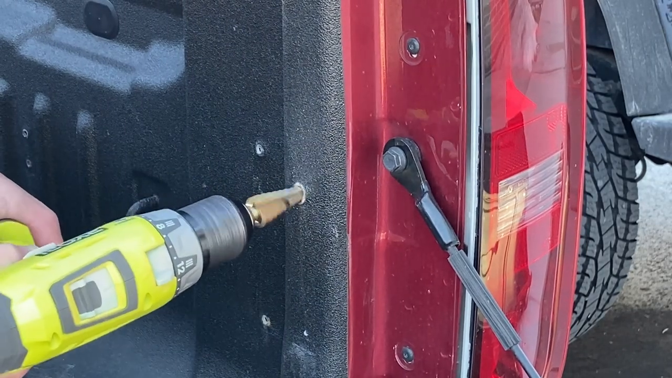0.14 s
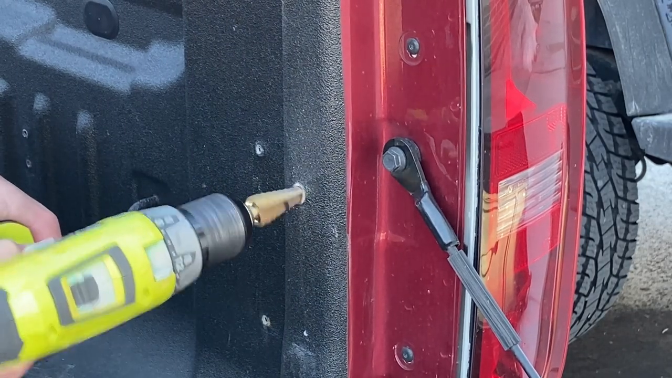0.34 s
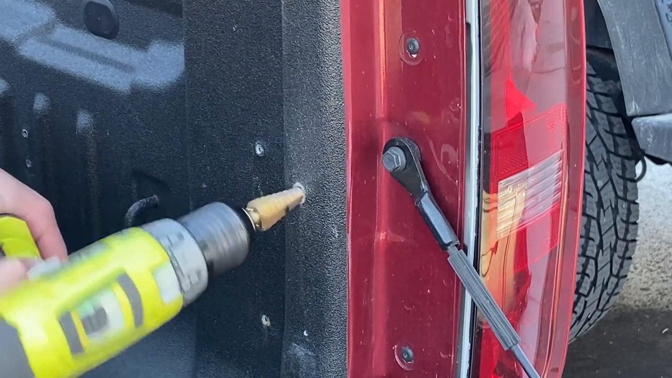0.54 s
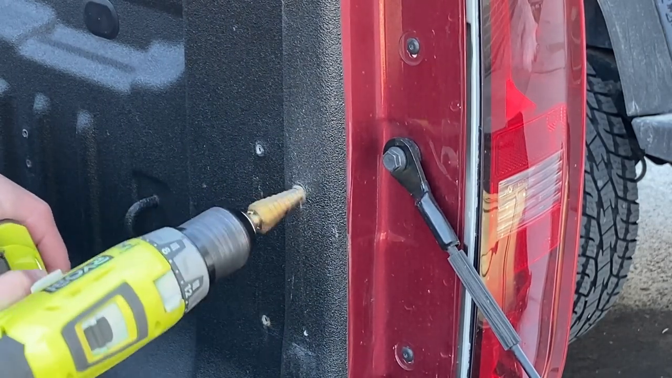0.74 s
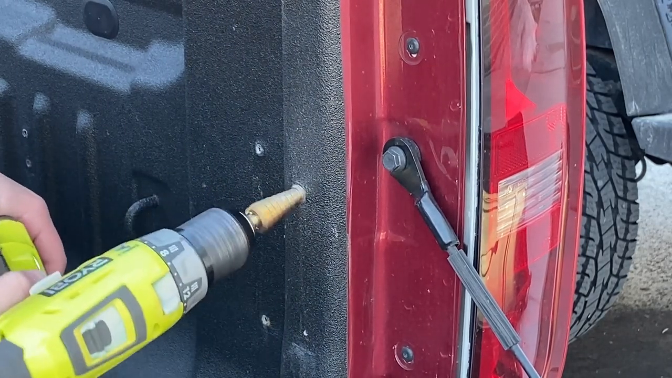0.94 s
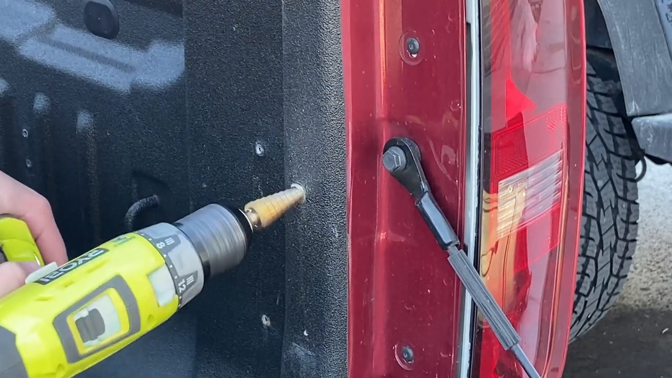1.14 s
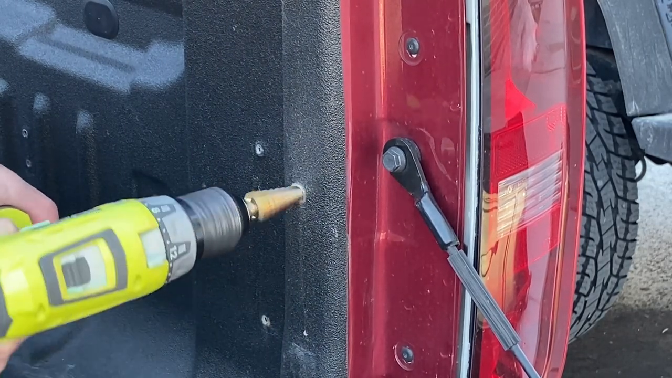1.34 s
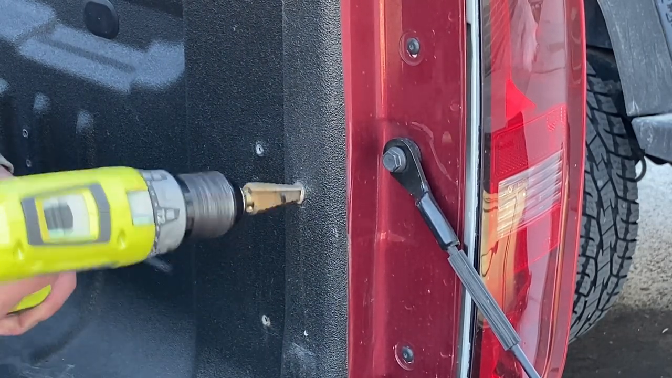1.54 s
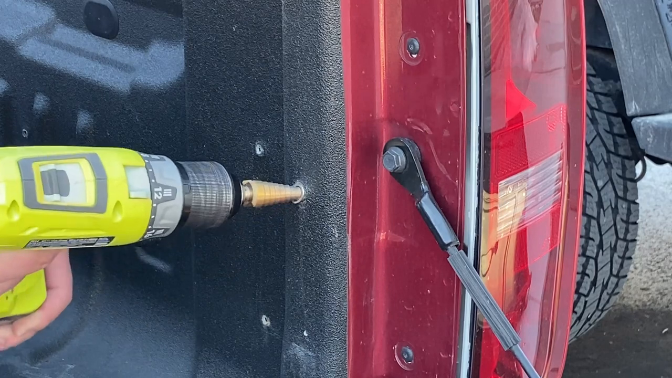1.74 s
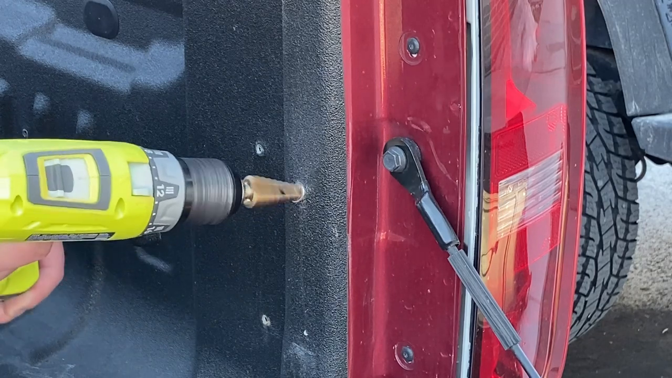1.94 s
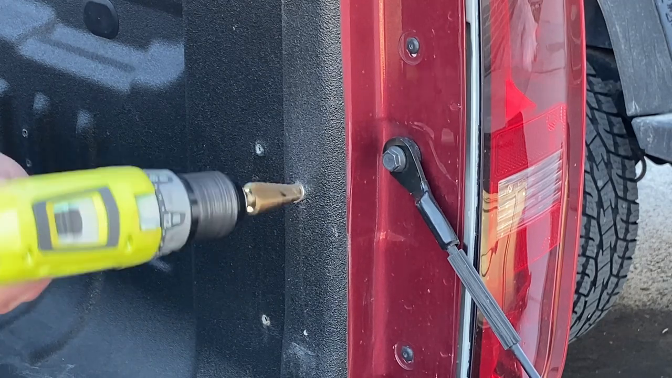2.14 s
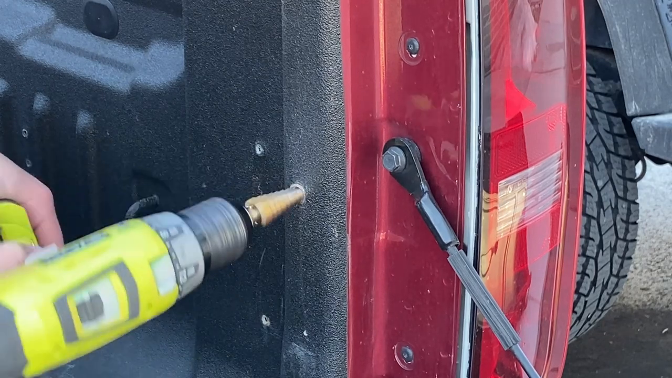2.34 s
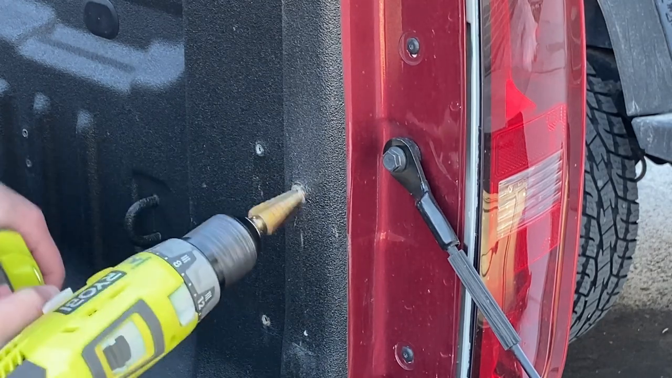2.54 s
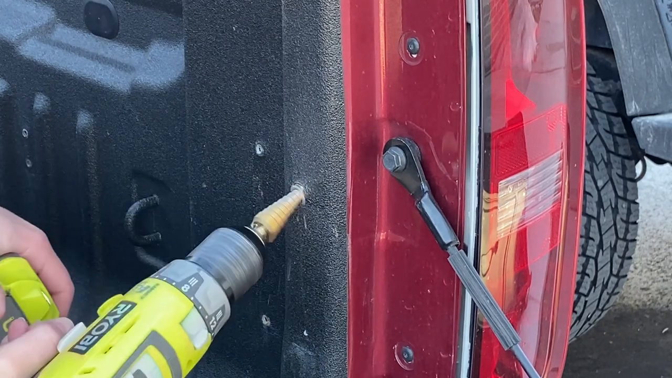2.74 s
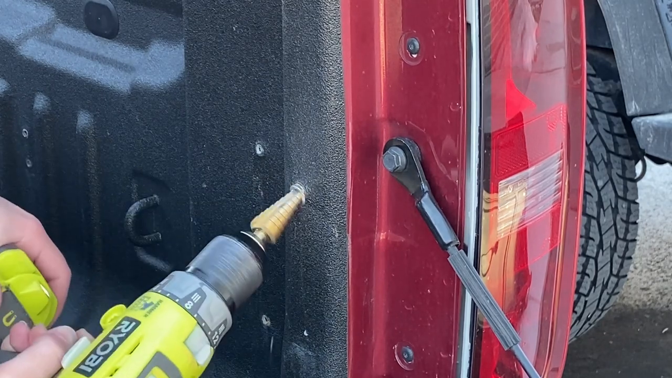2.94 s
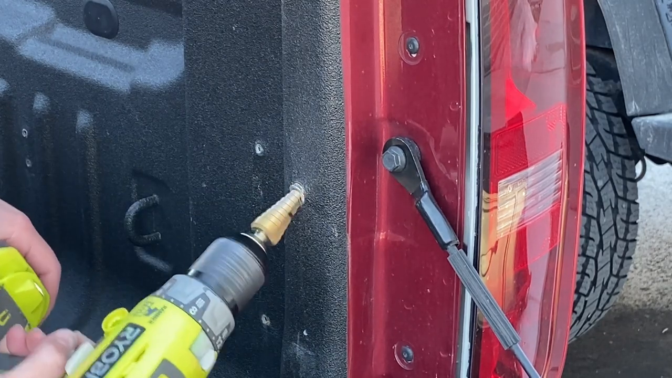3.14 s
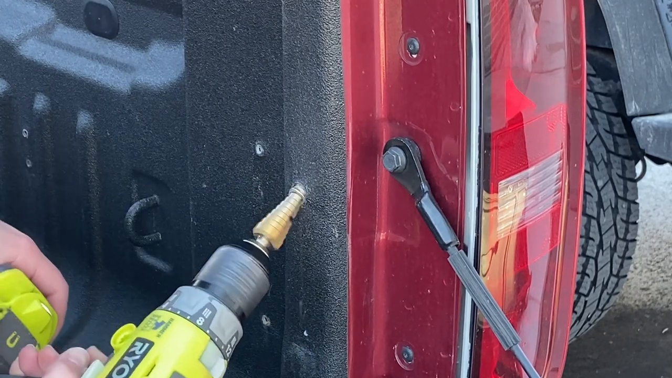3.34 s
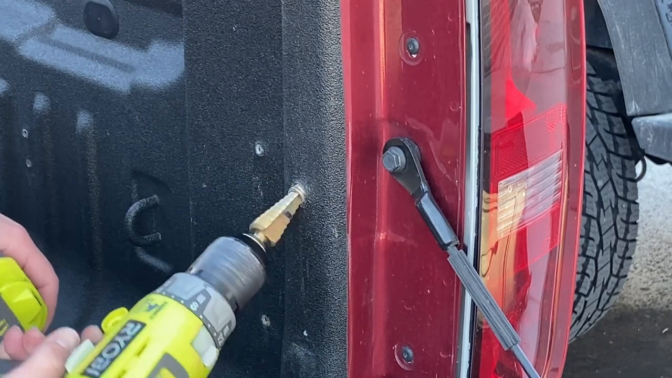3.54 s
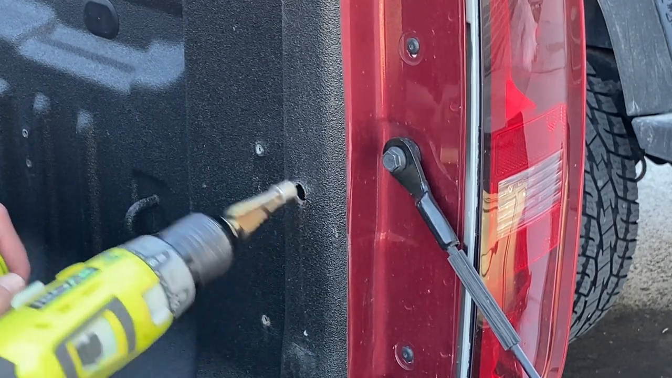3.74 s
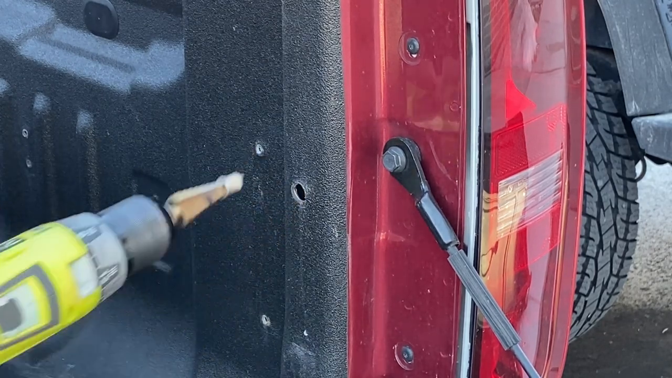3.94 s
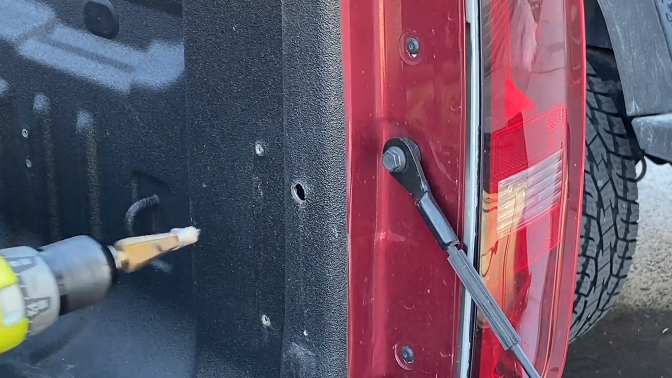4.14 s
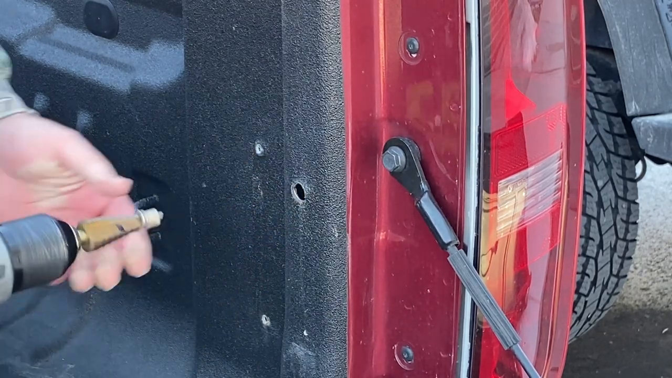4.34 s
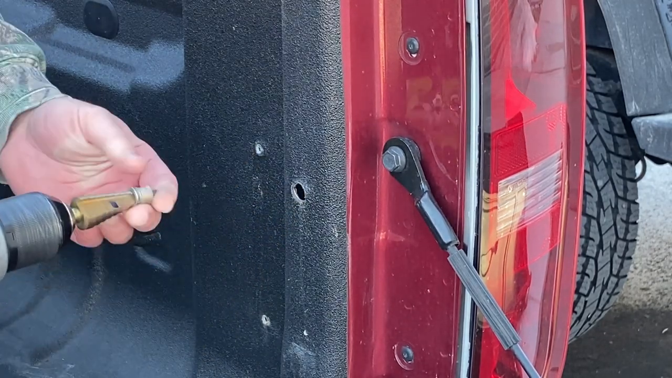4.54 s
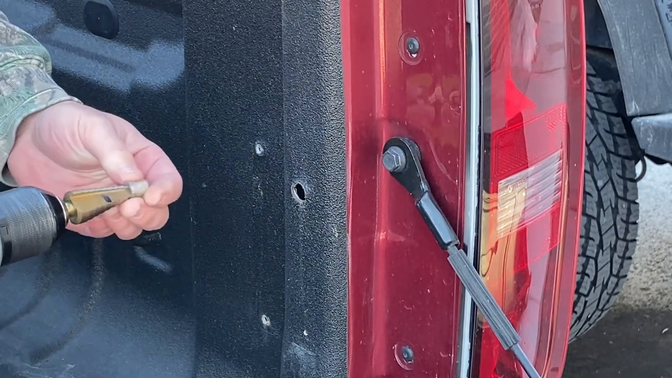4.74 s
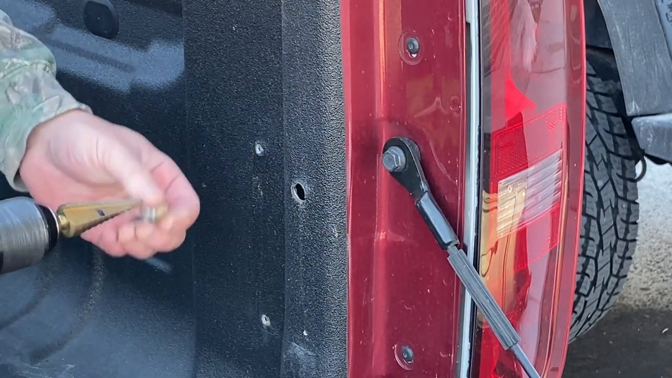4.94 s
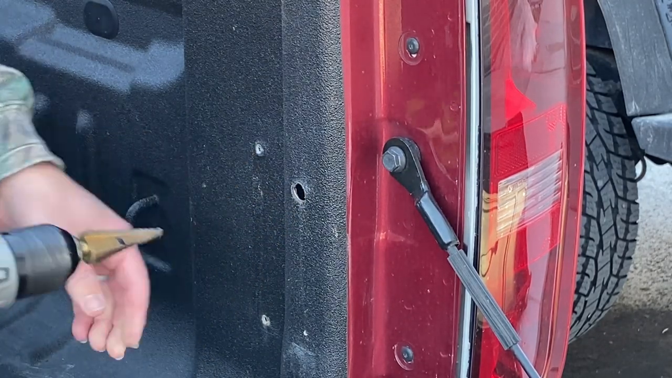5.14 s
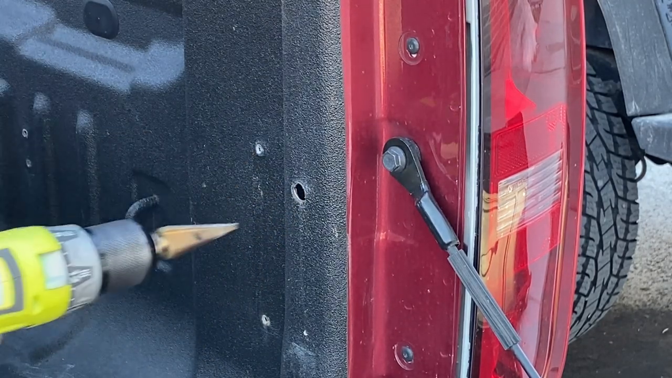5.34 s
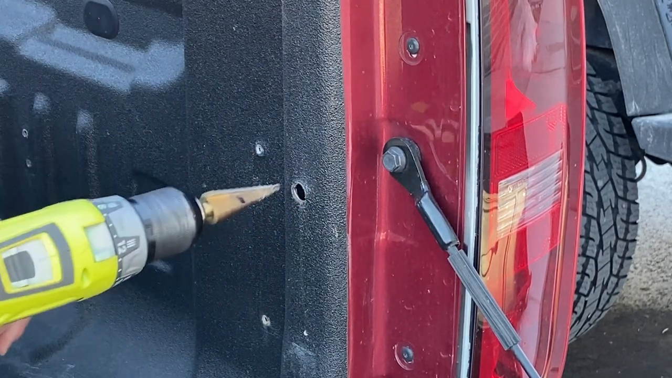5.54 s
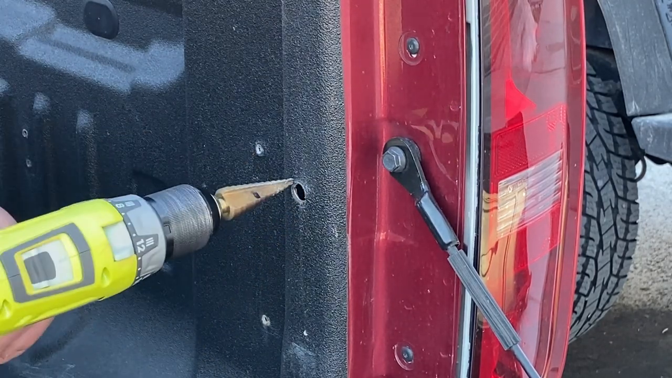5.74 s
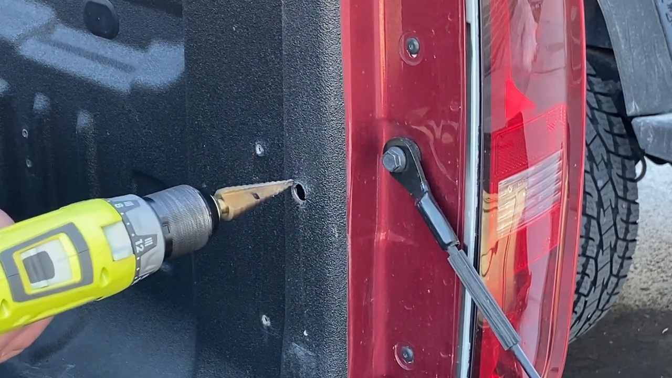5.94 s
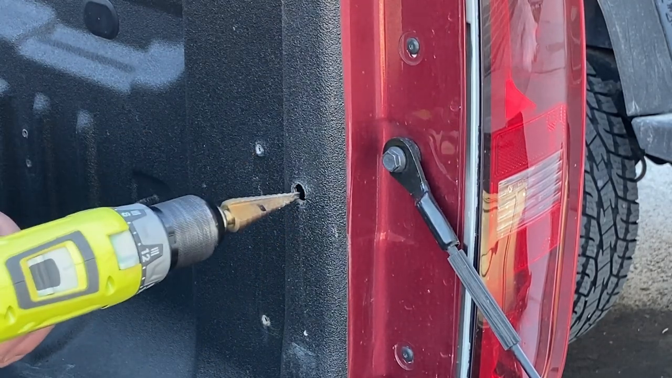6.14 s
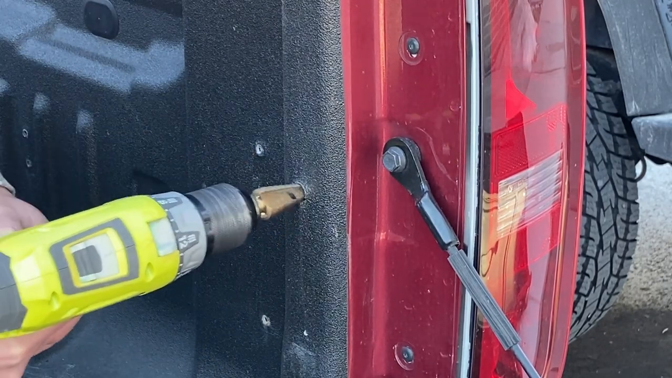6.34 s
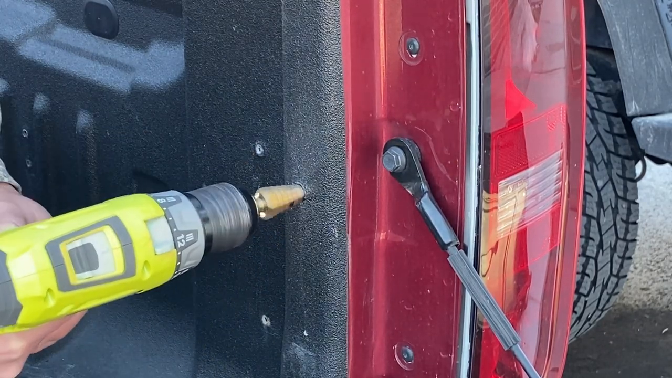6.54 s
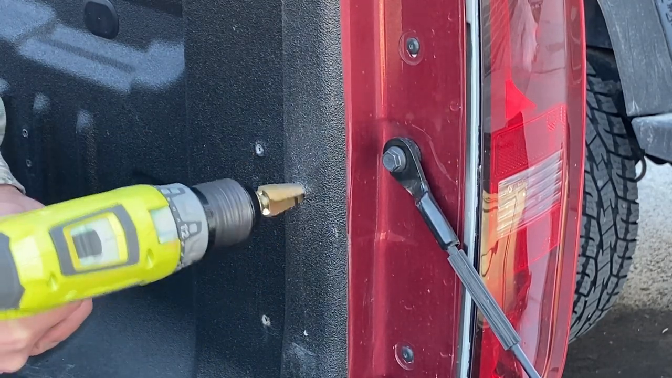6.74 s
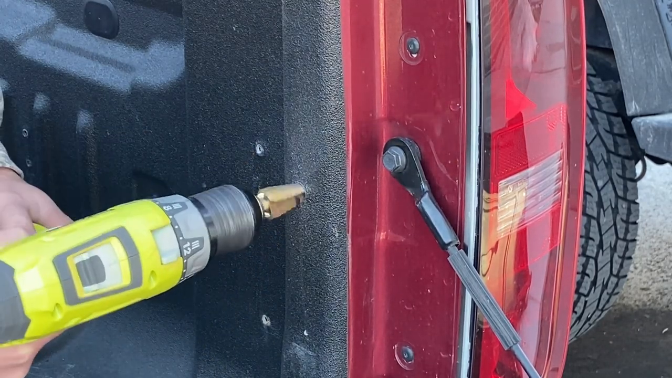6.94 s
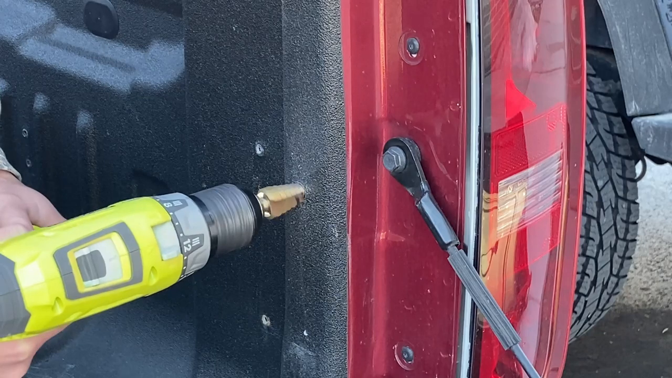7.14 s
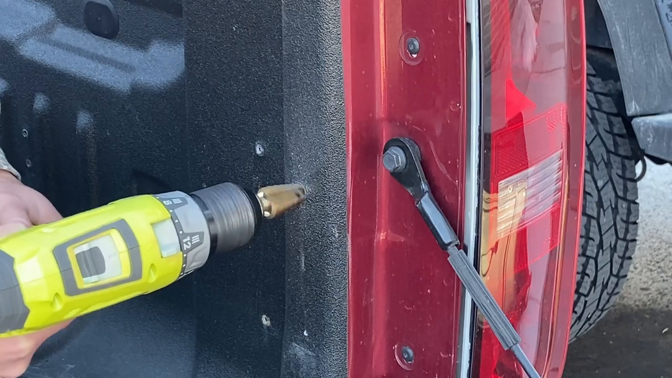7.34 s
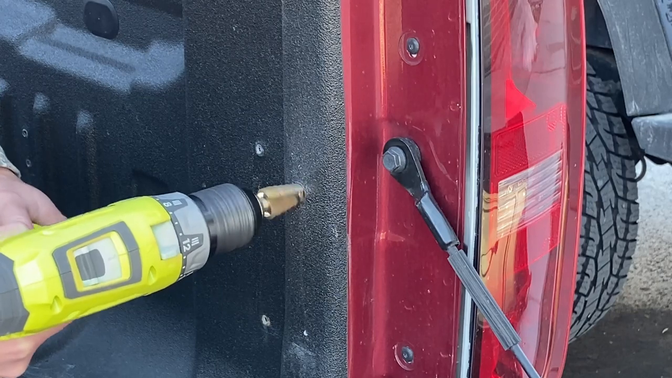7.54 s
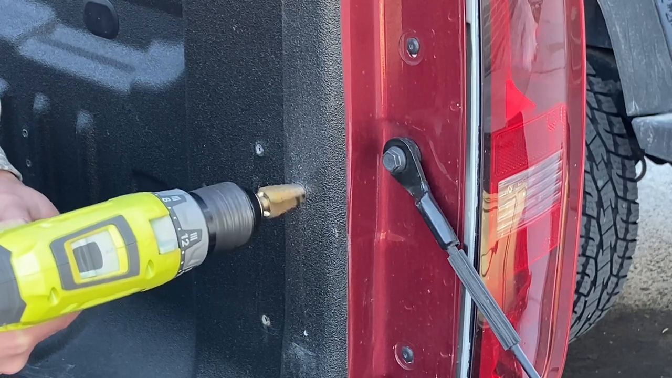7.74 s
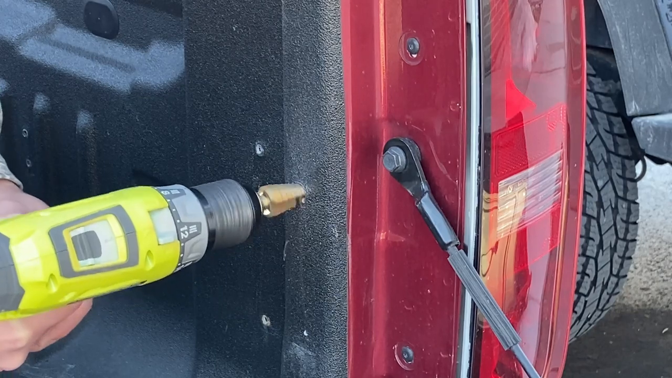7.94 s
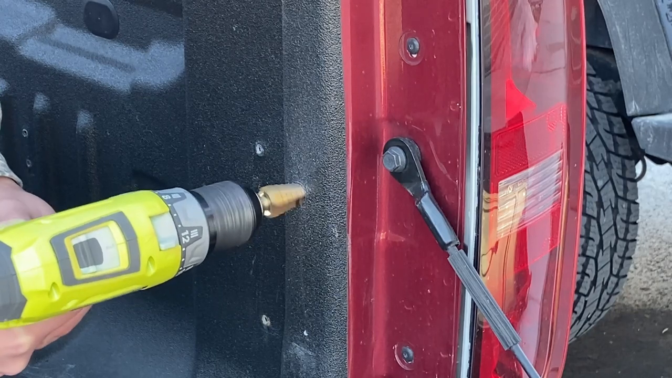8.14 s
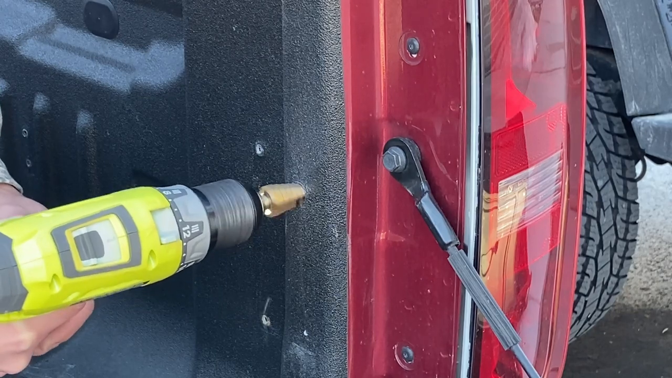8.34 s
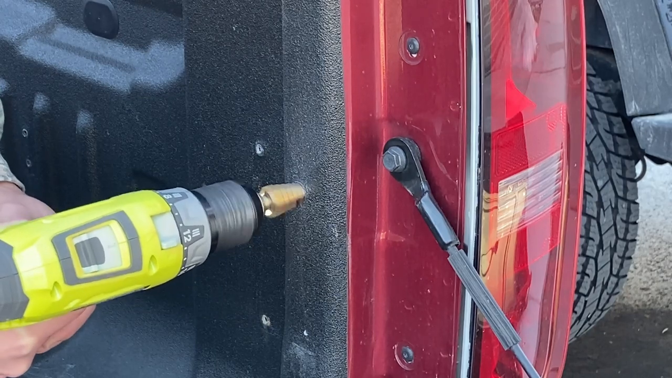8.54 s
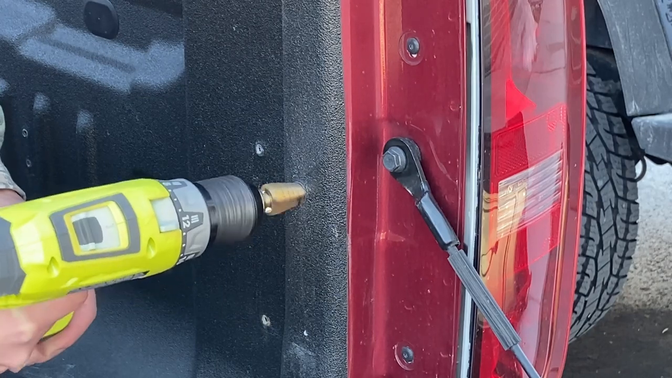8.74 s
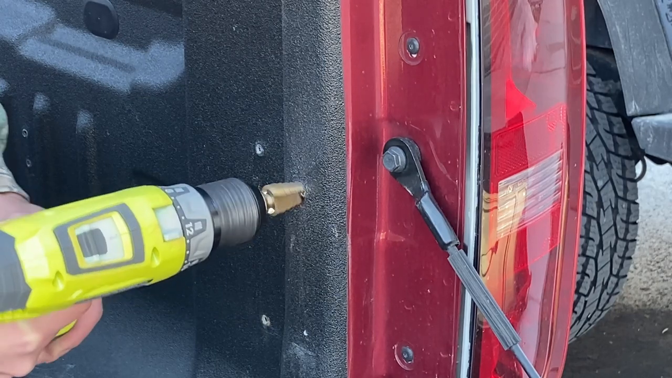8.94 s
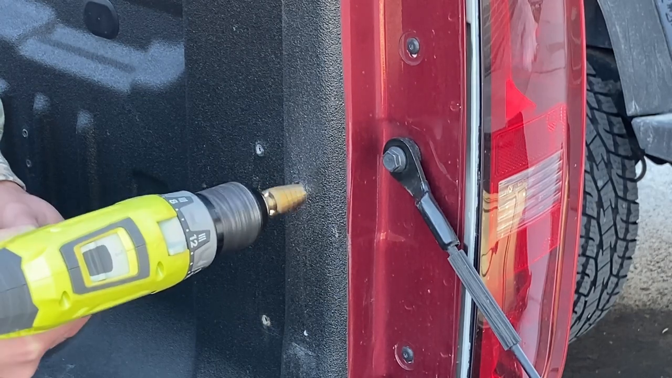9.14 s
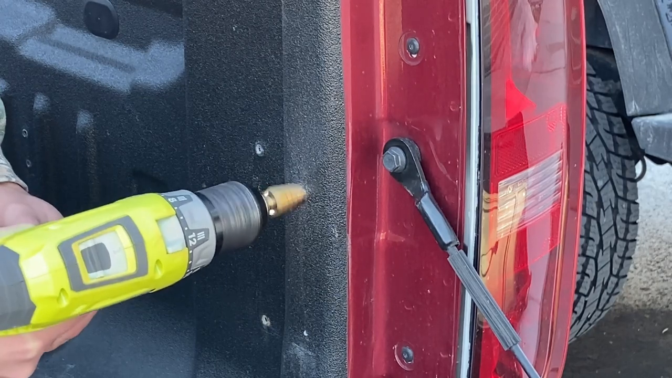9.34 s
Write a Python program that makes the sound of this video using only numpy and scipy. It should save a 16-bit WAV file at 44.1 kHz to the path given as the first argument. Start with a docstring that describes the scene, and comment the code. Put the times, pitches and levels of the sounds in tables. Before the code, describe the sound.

A cordless drill spins up close by and grinds into a steel truck bed, its gear whine and gritty rasp over a low panel drumming. It winds down, restarts almost at once with a sagging pitch, then stops. Scrapes and metal clacks fill the pause before a third burst with sharp bit catches. Close stereo microphone outdoors, faint street hum and light wind.

```python
"""A cordless drill with a stepped bit reams a fastener out of a steel truck bed, outdoors, in three bursts.
Hiss and gear rasp are shaped noise, the whine is a set of lines tied to motor speed, and the cutting force
swells once a turn and drums the bed panel's modes. At listed moments the bit catches; between bursts tool
and loose fastener knock on the steel, as dying noise puffs through resonances. The bed walls answer with
a diffuse tail; a distant street hum and light wind on the microphone lie behind."""
import sys
import numpy as np
from scipy import signal
from scipy.fft import rfft, irfft, next_fast_len
from scipy.io import wavfile
from scipy.ndimage import uniform_filter1d, map_coordinates

SR = 44100
rng = np.random.default_rng(int(sys.argv[2]) if len(sys.argv) > 2 else 0)


def bounce(signal):
    """Save signal as a 16-bit WAV file at the path given by the first command-line argument."""
    frames = np.transpose(np.atleast_2d(signal))
    limited = np.clip(frames, -1, 1)
    pcm = np.round(limited * 32767).astype(np.int16)
    wavfile.write(sys.argv[1], SR, pcm)


N = 414540  # samples


def amp(db):
    """Level to amplitude: 20 dB is a factor of ten."""
    return 10 ** (np.asarray(db) / 20)


def unit(x):
    """Normalisation to an rms of 1."""
    return x / np.sqrt(np.mean(x ** 2) + 1e-20)


def along(points, hz):
    """Interpolation of (frequency, value) points on a logarithmic frequency axis."""
    f, v = np.transpose(points)
    return np.interp(np.log(hz + 1), np.log(f + 1), v)


def curves(rows):
    """Linear interpolation in time: one value per sample for each column after the time."""
    s, *cols = np.transpose(rows)
    return [np.interp(np.arange(N) / SR, s, c) for c in cols]


def during(rows):
    """Gating: 1 while a table lasts, with 20 ms fades outside it."""
    t = np.arange(N) / SR
    inside = np.minimum(t - rows[0][0], rows[-1][0] - t)
    return np.clip(inside * 50 + 1, 0, 1)


def wobble(rate):
    """Slow random modulation: a smooth curve with rate knots a second."""
    knots = rng.standard_normal(int(N * rate / SR) + 4)
    return map_coordinates(knots, [np.arange(N) * rate / SR])


def filtered(x, response):
    """Linear filtering: the spectrum times a complex response of frequency."""
    m = next_fast_len(N + SR // 2)
    return irfft(rfft(x, m) * response(np.fft.rfftfreq(m, 1 / SR)), m)[..., :N]


def through(x, response):
    """Linear filtering with the response normalised to keep the rms of white noise."""
    return filtered(x, lambda f: response(f) / np.sqrt(np.mean(np.abs(response(f)) ** 2)))


def modes(table):
    """Modal superposition: causal damped resonators with alternating signs."""
    def response(f):
        return sum((-1) ** k * amp(db) * 1j * f * w / (c * c - f * f + 1j * f * w)
                   for k, (c, w, db) in enumerate(table))
    return response


def colour(points):
    """Spectral shaping: a zero-phase response that follows (frequency, level) points."""
    return lambda f: amp(along(points, f))


def lowpass(edge_hz):
    """Two cascaded first-order low-pass sections."""
    return lambda f: 1 / (1 + 1j * f / edge_hz) ** 2


def grit(rough_db, patchy_db):
    """Modulated noise: strength jumps by the millisecond, and narrow patches flare briefly."""
    noise = rng.standard_normal(N) * amp(rough_db * wobble(700))
    z = signal.stft(noise, nperseg=1024)[2]
    field = uniform_filter1d(rng.standard_normal(z.shape), size=2, axis=0)
    field = uniform_filter1d(field, size=5, axis=1)
    return unit(signal.istft(z * amp(patchy_db * unit(field)), nperseg=1024)[1][:N])


def bursts(times, levels_db, t60, rise=0.0004):
    """Exponential decay: noise puffs that fall 60 dB in t60 seconds."""
    out, t = np.zeros(N + SR), np.arange(SR // 4) / SR
    for s, db in zip(times, levels_db):
        envelope = amp(db - 60 * t / t60) * (1 - np.exp(-t / rise))
        out[round(s * SR):][:len(t)] += envelope * rng.standard_normal(len(t))
    return out[:N]


def tones(hz, db, waver_hz, waver_db, ratio=1):
    """Frequency modulation: the integral of a gliding, slightly unsteady pitch is the phase."""
    level = amp(db + 0.5 + waver_db * wobble(25))
    pitch = ratio * (hz + waver_hz * wobble(60))
    return level * np.sin(2 * np.pi * np.cumsum(pitch) / SR)


# motor speed in each of three bursts: (time [s], gear mesh frequency [Hz])
MOTOR_SPEED = [
    [(.04, 250.8), (.09, 900), (.16, 2703), (.21, 3834), (.265, 4106), (.55, 4164), (.63, 3985),
     (.77, 4143), (.8, 3933), (.88, 4082), (.92, 3940), (.98, 4132), (1.06, 4153), (1.17, 4046),
     (1.3, 4184), (1.39, 4224), (1.435, 4193), (1.57, 3252), (1.63, 2684), (1.76, 2459), (1.8, 1990),
     (1.84, 1495), (1.865, 299.2)],
    [(1.98, 500.5), (2.0, 1300), (2.035, 2606), (2.085, 3484), (2.12, 3827), (2.21, 3840), (2.27, 3439),
     (2.37, 2912), (2.42, 2895), (2.47, 3847), (2.54, 4085), (2.59, 3990), (2.63, 4050), (2.74, 3850),
     (2.8, 3213), (2.89, 2917), (2.92, 2414), (3.17, 2364), (3.205, 3385), (3.27, 3983), (3.39, 4163),
     (3.5, 3628), (3.575, 3178), (3.61, 502.6)],
    [(6.5, 704), (6.56, 1102), (6.76, 2759), (6.9, 2600), (7.29, 2900), (7.36, 3794), (7.43, 4010),
     (7.7, 4163), (7.9, 4110), (7.98, 4010), (8.1, 3974), (8.25, 4040), (8.35, 3940), (8.51, 3850),
     (8.58, 3927), (8.62, 3886), (8.67, 3940), (8.72, 3870), (8.78, 3967), (8.89, 3770), (8.97, 3790),
     (9.02, 3870), (9.075, 3850), (9.11, 2830), (9.28, 2785), (9.33, 3650), (9.4, 3900)],
]
FULL_HZ = 4100  # mesh frequency at full speed


def motor():
    """Gear meshing: pitch follows speed; gives mesh Hz, speed in dB re full speed, and 1 while turning."""
    hz, = curves(sum(MOTOR_SPEED, []))
    return hz, 20 * np.log10(hz / FULL_HZ), sum(during(rows) for rows in MOTOR_SPEED)


# each burst is held at its own angle, one row a burst: (hiss [dB], rasp [dB], rumble [dB])
BURST_ANGLE = [(0.3, 0.47, 3), (0.54, 0.8, -2.5), (0.53, -0.5, -2.5)]


def held():
    """Directivity: gains of hiss, rasp and rumble, each burst's own while it lasts and 0 between."""
    return sum(amp(db)[:, None] * during(rows) for rows, db in zip(MOTOR_SPEED, BURST_ANGLE))


# hiss spectrum of brushes and fan: (frequency [Hz], relative density [dB per Hz])
HISS_SPECTRUM = [(1500, -22.5), (4000, -7.5), (6000, -5), (7200, -1.5), (8300, -3.5), (10300, 1.5),
                 (11200, -6.5), (13000, -3), (16000, -4)]
# relative level at full speed [dB], and dB gained per dB of speed
HISS_DB, HISS_GROWS = -42, 2.25
DRAG_HISS_DB = -13  # re the scrape of the dragging bit


def brush_hiss(speed_db, angle, drag, shake):
    """Broadband brush and fan noise, whose level grows as a power of speed."""
    hiss = amp(7 + .5 * shake) * through(grit(rough_db=1.0, patchy_db=3.0), colour(HISS_SPECTRUM))
    return (angle * amp(HISS_DB + HISS_GROWS * speed_db) + amp(DRAG_HISS_DB) * drag) * hiss


# gearbox resonances: (frequency [Hz], width [Hz], relative level [dB])
GEARBOX_MODES = [(1345, 263, -1.5), (1784, 770, -5.5), (2407, 403, 0.5), (2738, 347, 2), (3310, 750, -4.5),
                 (3850, 450, -2.5), (4526, 400, -5), (5280, 470, -8.5)]
# strongest band of the rasp: (frequency [Hz], width [Hz], level [dB])
STRONG_BAND = (2600, 700, 0)
# change at the centre of that band: (time [s], gain [dB])
STRONG_BAND_GAIN = [(0, -1), (1.4, -2.5), (1.62, 5.5), (2.1, -1), (3.0, -1.5), (3.6, -9.5), (6.6, 3),
                    (7.3, 4.5), (8.0, -2), (8.45, 3), (9.1, 4.5), (9.4, -2)]
# relative level at full speed [dB], and dB gained per dB of speed
RASP_DB, RASP_GROWS = -37, 1.8
RASP_PUSHED = 0.16  # share of the push that the gear rasp follows


def gear_rasp(speed_db, push_db, angle, drag, turn, shake):
    """Resonant filtering: gritty gear noise excites the gearbox modes and swells once a turn."""
    rasp = through(grit(rough_db=1.5, patchy_db=3), modes(GEARBOX_MODES))
    rasp *= amp(0.5 + 0.56 * turn + 1.77 * shake)
    band_gain = amp(curves(STRONG_BAND_GAIN)[0])
    rasp += (band_gain - 1) * filtered(rasp, modes([STRONG_BAND]))
    driven = angle * amp(RASP_DB + RASP_GROWS * speed_db + RASP_PUSHED * push_db)
    return (driven + drag) * rasp


# whine against pitch: (mesh frequency [Hz], relative level [dB])
WHINE_BY_PITCH = [(2000, -80), (2500, -56), (3250, -48), (3700, -44), (4200, -43)]
# further change of the whine: (time [s], gain [dB])
WHINE_GAIN = [(.22, 2), (.45, -3), (.55, 1), (.95, 2), (1.17, -5), (1.34, 3), (1.47, 0), (2.6, 1),
              (2.8, -1), (3.45, 0), (7.7, 0), (8.2, -3), (8.45, 1), (8.8, 2), (8.9, -3), (9.3, 0)]
# weaker lines beside the whine: (multiple of motor shaft speed, level [dB re whine])
SHAFT_LINES = [(1, -10), (5, -8), (10, -10)]
PINION_TEETH = 12
SPIN_UP_LOSS_DB, SPIN_UP_HZ_PER_S = 13, 24000  # greatest loss, reached when speed changes this fast
LABOUR_HZ = 10  # pitch sways this far each way once a turn


def gear_whine(mesh_hz, turn):
    """Tonal radiation at the mesh frequency and shaft multiples, buried while speed changes fast."""
    whine_db = along(WHINE_BY_PITCH, mesh_hz) + curves(WHINE_GAIN)[0]
    hz_per_s = np.abs(uniform_filter1d(np.gradient(mesh_hz) * SR, size=SR // 50))
    whine_db -= SPIN_UP_LOSS_DB * np.minimum(hz_per_s / SPIN_UP_HZ_PER_S, 1) ** 3
    whine = tones(mesh_hz + LABOUR_HZ * turn, whine_db, waver_hz=4, waver_db=1.2)
    for k, db in SHAFT_LINES:
        whine += tones(mesh_hz, whine_db + db, waver_hz=12, waver_db=5, ratio=k / PINION_TEETH)
    return whine


# speed controller's tone while the trigger is barely pulled: (time [s], frequency [Hz], relative level [dB])
SWITCHING_TONE = [
    [(6.52, 7900, -66), (6.55, 7760, -68), (6.66, 7730, -56)],
]


def speed_controller():
    """Electronic switching heard as a gliding pure tone."""
    return sum(during(rows) * tones(*curves(rows), waver_hz=3, waver_db=0.0) for rows in SWITCHING_TONE)


# how hard the bit is pushed into the steel: (time [s], relative force [dB])
PUSH_FORCE = [(0, -13.5), (.15, -11), (.2, -1.5), (.32, -1), (.37, 0), (1.1, 0.3), (1.5, -4), (1.8, 1.3),
              (2.05, -1.5), (2.16, 2.5), (2.3, -1), (2.75, 1.5), (3.0, 1.5), (3.15, 2.5), (3.23, -10),
              (3.6, 2.5), (6.5, -5), (6.6, 2.5), (6.76, 1), (7.2, -1), (7.4, 5), (7.88, 3.5), (7.95, 1.5),
              (9.08, 3), (9.4, -4)]
# slow or stopped bit scraping in the hole: (time [s], relative level [dB])
DRAG_LEVEL = [
    [(0, -65.5), (.05, -85)],
    [(1.87, -79), (1.97, -79.5)],
    [(3.64, -75.5), (3.8, -61), (3.86, -53)],
]
# panel mode that hums under the bit: (frequency [Hz], width [Hz], level [dB re pressing force])
FAVOURED_MODE = (517, 20, -8)
MESHES_A_TURN = 400
# relative force at full speed [dB], dB gained per dB of speed, and drag force [dB re scrape]
DRUM_DB, DRUM_GROWS, DRAG_DRUM_DB = -37, 1.34, 8
# a slow bit shakes the lowest modes more: [dB re pressing], dB per dB of speed, upper edge [Hz]
SHUDDER_DB, SHUDDER_GROWS, SHUDDER_HZ = -9, -2.1, 280


def drill():
    """Airborne and structure-borne paths: returns radiated sound and the force on the panel."""
    mesh_hz, speed_db, running = motor()
    push_db, = curves(PUSH_FORCE)
    turn = np.cos(2 * np.pi * np.cumsum(mesh_hz / MESHES_A_TURN) / SR)  # the bit runs out of true
    shake = wobble(18)
    drag = sum(during(rows) * amp(curves(rows)[0]) for rows in DRAG_LEVEL)
    hiss_angle, rasp_angle, _ = held()
    air = brush_hiss(speed_db, hiss_angle, drag, shake)
    air += gear_rasp(speed_db, push_db, rasp_angle, drag, turn, shake)
    air += running * gear_whine(mesh_hz, turn) + speed_controller()

    cut = amp(-0.7 + 0.6 * turn + 2.0 * wobble(30)) * grit(rough_db=1.5, patchy_db=1.0)
    pressing = running * amp(DRUM_DB + DRUM_GROWS * speed_db + push_db) * cut
    air += amp(FAVOURED_MODE[2]) * through(pressing, modes([FAVOURED_MODE]))
    shudder_gain = running * amp(SHUDDER_DB + SHUDDER_GROWS * np.maximum(speed_db, -8))
    # running is already in pressing, so its short fades must not be applied twice
    shudder_gain = np.where(running > 0, amp(SHUDDER_DB + SHUDDER_GROWS * np.maximum(speed_db, -8)), 0)
    shudder = filtered(shudder_gain * pressing, lowpass(SHUDDER_HZ))
    return air, pressing + shudder + amp(DRAG_DRUM_DB) * drag * cut


# panel modes that ring on after a blow: (frequency [Hz], relative level [dB], t60 [s])
RINGING_MODES = [(177, -13.5, .3), (278, -10.5, .25), (387.4, -7, .2), (516.1, 1, .16), (577, -12.5, 0.34)]


def ringing(times, levels_db):
    """Free vibration: lightly damped modes ring at a new strength and slightly new pitch each blow."""
    out, t = np.zeros(N + SR), np.arange(SR // 2) / SR
    for s, db in zip(times, levels_db):
        ring = 0
        for hz, level, t60 in RINGING_MODES:
            decay = amp(level + rng.normal(0, 2) - 60 * t / t60)
            ring = ring + decay * np.sin(2 * np.pi * hz * rng.normal(1, 0.0201) * t)
        out[round(s * SR):][:len(t)] += amp(db) * (1 - np.exp(-t / 0.0038)) * ring
    return out[:N]


# the bit catching in the hole: (time [s], relative bit ring [dB], relative panel jolt [dB])
BIT_CATCHES = [(0.214, -32, -19), (0.272, -36.5, -18), (0.303, -33.5, -14.5), (0.882, -21, -25),
               (2.07, -24.5, -26), (2.178, -38.5, -22), (2.6448, -23.5, -33), (2.662, -38, -20.5),
               (2.915, -35, -24), (3.097, -42, -21), (7.0645, -23.5, -18.5), (7.267, -18, -26),
               (7.402, -14.5, -20), (7.499, -18.5, -23.5), (7.594, -13.5, -16), (7.6201, -17.5, -28),
               (7.6893, -13.5, -12.5), (7.708, -14.5, -21), (7.877, -16, -11), (7.9745, -18, -17),
               (8.0752, -17.5, -24.5), (8.267, -26.5, -23.5), (8.367, -17, -23), (8.565, -38, -25.5),
               (8.672, -42, -23), (8.772, -34, -18.5), (9.055, -36, -19)]
# resonances of the bit: (frequency [Hz], width [Hz], relative level [dB])
BIT_MODES = [(1264, 140, 1), (3330, 370, -3), (4027, 160, 2.5), (4660, 170, 3), (5500, 410, -6),
             (7800, 2100, -14)]
JOLT_HZ = 905  # a catch is a soft jolt, with little above this


def catches():
    """Transient excitation: the edge bites, rings the bit briefly, jolts the panel and sets it ringing."""
    s, ring_db, panel_db = np.transpose(BIT_CATCHES)
    jolt = filtered(bursts(s, panel_db, t60=0.04, rise=0.0053), lowpass(JOLT_HZ))
    bit = through(bursts(s, ring_db - 9.5, t60=0.066, rise=0.00029), modes(BIT_MODES))
    return bit + ringing(s, panel_db - 9.5), jolt


# knocks on the steel, all levels relative:
# (time [s], bright clack [dB], dull clack [dB], tick [dB], panel [dB])
STEEL_KNOCKS = [(3.704, -41, -39, -51, -47), (3.844, -27.5, -35, -47, -27.5), (3.8784, -48, -47, -56, -37),
                (4.6158, -64, -66, -63.5, -79.5), (5.3387, -37, -17.5, -43, -25.5),
                (5.3662, -18, -32, -47, -42.5), (5.445, -55, -37.5, -63, -46.5),
                (5.4946, -32, -35, -57, -53.5), (5.5244, -46, -39, -70, -55),
                (5.7907, -59, -51, -81, -56.5), (5.8126, -53, -49.5, -59, -47.5),
                (5.8308, -63, -57, -59, -61), (6.348, -40, -43, -59, -32.5), (6.4185, -30.5, -36, -52, -31),
                (6.472, -29, -41, -54, -40), (6.4849, -26, -26, -41.5, -24), (6.4967, -25.5, -25, -39, -32)]
# plain clack spectrum: (frequency [Hz], relative density [dB per Hz])
CLACK_SPECTRUM = [(500, -12), (1100, 3.5), (2000, -2), (2900, -6), (4500, -13.5), (7000, -38.5)]
# resonances in the clack: (frequency [Hz], width [Hz], relative level [dB])
STEEL_MODES = [(1224, 74, -4.5), (1380, 42, -3), (2270, 120, -14), (2640, 73, 8.5), (3000, 420, -3.5),
               (3700, 63, -10), (4100, 81, -14)]
# tick spectrum: (frequency [Hz], relative density [dB per Hz])
TICK_SPECTRUM = [(2500, -20), (4000, -1), (8000, -13.5), (16000, -23)]
STEEL_DB = 1  # resonances over the plain clack
SPLIT_HZ = 1600  # the dull part of a clack lies below, the bright part above


def steel_response(f):
    """Resonance on a broadband base: the clack spectrum multiplied by the steel's modes."""
    return colour(CLACK_SPECTRUM)(f) * (1 + amp(STEEL_DB) * modes(STEEL_MODES)(f))


def clack_puffs(s, db):
    """Two-stage decay: a quick clack over a fainter rattle that dies more slowly."""
    quick = bursts(s, db - 2.0, t60=0.062, rise=0.0003)
    return through(quick + bursts(s, db - 16.0, t60=0.2), steel_response)


def knocks():
    """Impact excitation: a sharp tick, a clack with its rattle, and a soft push on the panel."""
    s, bright_db, dull_db, tick_db, panel_db = np.transpose(STEEL_KNOCKS)
    low = lowpass(SPLIT_HZ)
    clack = filtered(clack_puffs(s, dull_db), low)
    clack += filtered(clack_puffs(s, bright_db), lambda f: low(f) * (f / SPLIT_HZ) ** 2)
    tick = bursts(s, tick_db + 3.0, t60=0.025) + bursts(s, tick_db - 17, t60=0.17)
    tick = through(tick, colour(TICK_SPECTRUM))
    blows = np.bincount(np.round(s * SR).astype(int), amp(panel_db - 14.5), N)
    blows += bursts(s, panel_db - 27.5, t60=0.2)
    push = np.convolve(blows, np.hanning(SR // 900))[:N]  # the contact lasts about a millisecond
    return clack + tick + ringing(s, panel_db + 1.5), push


def scattered(x):
    """Diffuse reflection: the bed walls' short tail changes as tool and hands move."""
    hop, t = SR // 8, np.arange(SR // 10) / SR
    padded, out = np.pad(x, 2 * hop), np.zeros(N + SR)
    window = np.sqrt(np.hanning(2 * hop))
    for at in range(0, N + 2 * hop, hop):
        walls = rng.standard_normal(len(t)) * amp(-60 * t / 0.15)
        answer = signal.fftconvolve(padded[at:at + 2 * hop] * window, walls / np.linalg.norm(walls))
        out[at:at + len(answer)] += answer
    return out[2 * hop:][:N]


def spread(pair, alike):
    """Interchannel coherence: mid and side are weighted so the channels are as alike as the table says."""
    def weights(hz):
        angle = np.arccos(np.clip(along(alike, hz), 0, 1)) / 2
        return np.array([np.cos(angle), np.sin(angle)])
    mid, side = filtered(pair, weights)
    return np.array([mid + side, mid - side])


# distant hum: (frequency [Hz], relative density [dB per Hz])
HUM_SPECTRUM = [(59, -41), (100, -4.5), (208, -9.5), (247, -0.5), (340, -20), (722, -17.5), (1370, -22.5),
                (2030, -25), (2850, -34), (3580, -42), (9000, -61), (11700, -95.5), (19800, -120)]
# wind and drill rumble: (frequency [Hz], relative density [dB per Hz])
BUFFET_SPECTRUM = [(20, -37), (52, -4), (86, 1), (124, -3.5), (333, -26), (580, -83), (990, -120)]
# gusts on the microphone: (time [s], relative peak [dB], time to fall 15 dB either side [s])
WIND_GUSTS = [(0.239, -42.5, 0.062), (0.622, -38.5, 0.067), (2.488, -40, 0.087), (3.865, -50, 0.25),
              (4.748, -52.5, 0.26), (4.955, -39, 0.064), (5.193, -36, 0.093), (6.534, -48, 0.1)]
# background likeness of the channels: (frequency [Hz], left-right likeness [0 to 1])
FAR_LIKENESS = [(60, 1), (250, 0.84), (400, 0.2), (1000, 0.093), (1400, 0.285), (2100, 0.4), (3000, 0.85)]
OUTDOORS_DB, BREEZE_DB = -61, -58  # relative levels
# relative level at full speed [dB], and dB gained per dB of speed
RUMBLE_DB, RUMBLE_GROWS = -53, 0.55


def outdoors():
    """Ambient noise: a distant street hum, and turbulent wind lumps joined by the drill's low rumble."""
    hum = through(rng.standard_normal((2, N)), colour(HUM_SPECTRUM))
    hum *= amp(OUTDOORS_DB + 0.53 * wobble(6.1))
    lumps = amp(2.6 * wobble(20)) * rng.standard_normal((2, N))
    speed_db, rumble_angle = motor()[1], held()[2]
    t = np.arange(N) / SR
    gusts = sum(amp(db - 15 * np.abs(t - s) / half) for s, db, half in WIND_GUSTS)
    rumble = rumble_angle * amp(RUMBLE_DB + RUMBLE_GROWS * speed_db)
    strength = amp(BREEZE_DB) + gusts + rumble
    return spread(hum + strength * through(unit(lumps), colour(BUFFET_SPECTRUM)), FAR_LIKENESS)


# bed panel modes: (frequency [Hz], width [Hz], relative level [dB])
PANEL_MODES = [(173.4, 15.2, -6), (229.5, 10.4, -6), (270.4, 11, -4.5), (350.4, 26.3, -1.5),
               (397.3, 28, -5.5), (470, 30, -1.5), (514.6, 16, 1), (591, 38, -3.5), (726, 69, -8),
               (829, 49.4, -7.5), (983, 60, -11.5), (1231, 36, -16.5)]
# likeness of the channels for near sources: (frequency [Hz], left-right likeness [0 to 1])
NEAR_LIKENESS = [(60, 1), (500, 0.93), (680, 0.44), (850, 1), (1070, .7), (1400, 0.83), (2100, 1),
                 (5000, 1)]


def scene():
    """Superposition: all near forces drive one panel, heard directly and by way of the bed walls."""
    air, force = np.sum([drill(), catches(), knocks()], axis=0)
    near = air + through(force, modes(PANEL_MODES))
    return spread(np.array([near, scattered(near)]), NEAR_LIKENESS) + outdoors()


# phase between the ports: (frequency [Hz], left lead [rad])
LEFT_LEAD = [(100, 0.018), (500, 0.5), (1400, 0.38), (2000, 0), (7400, 0), (7600, -0.78), (9050, -np.pi),
             (11200, -2 * np.pi), (13400, -3 * np.pi), (15700, -4 * np.pi)]
# level between the ports: (frequency [Hz], left minus right [dB])
LEFT_LEVEL = [(180, 0), (330, -2.5), (550, 3), (1100, 2), (1500, -1), (2000, 0)]
TOP_HZ = 15780  # middle of the 100 Hz wide band edge


def record(dry):
    """Interchannel phase and level: two microphone ports share each difference, then the band limit."""
    def ports(hz):
        half = amp(along(LEFT_LEVEL, hz) / 2) * np.exp(.5j * along(LEFT_LEAD, hz))
        band = np.clip((TOP_HZ - hz) / 100 + .5, 0, 1) ** 2
        return np.array([half, 1 / half]) * band
    return filtered(dry, ports)


dry = scene()
out = record(dry)
bounce(out)
```